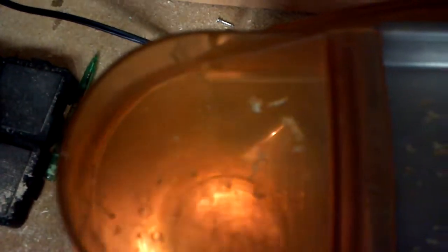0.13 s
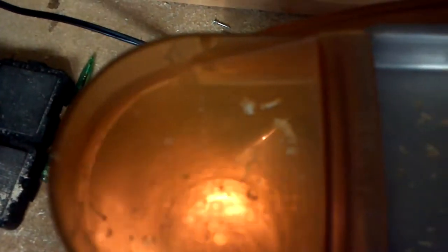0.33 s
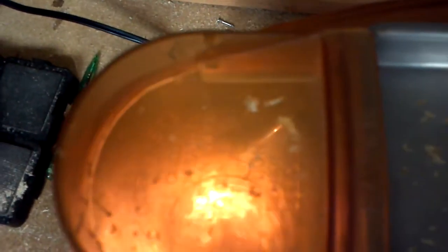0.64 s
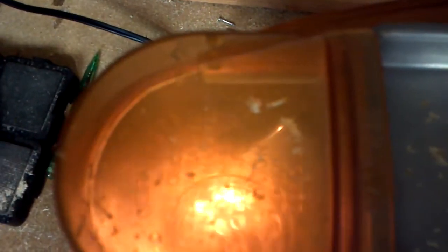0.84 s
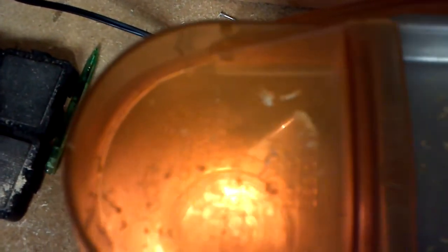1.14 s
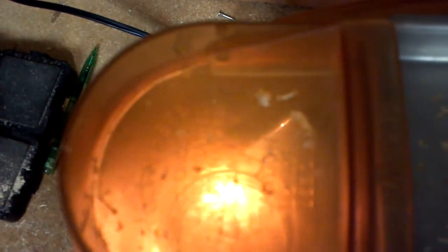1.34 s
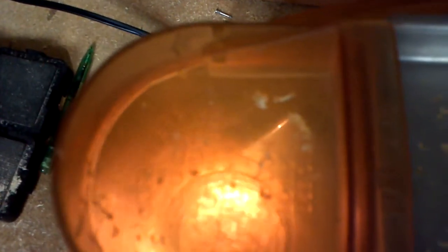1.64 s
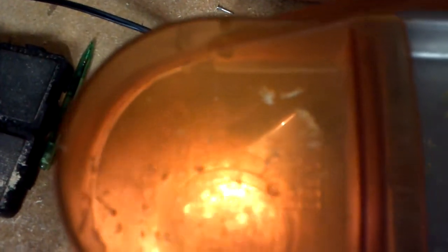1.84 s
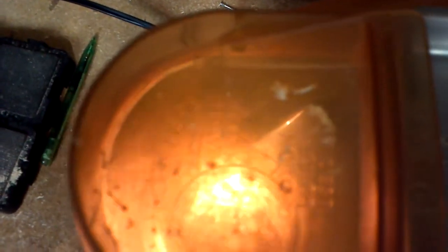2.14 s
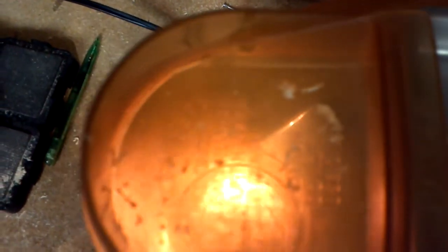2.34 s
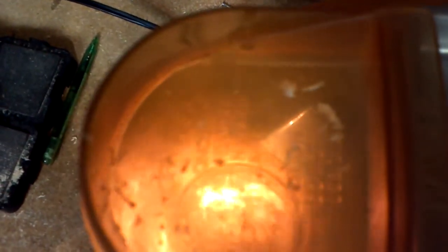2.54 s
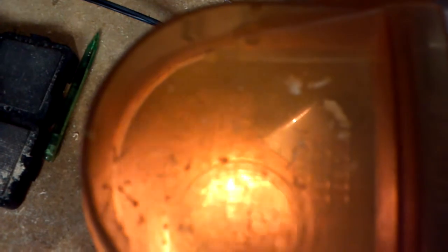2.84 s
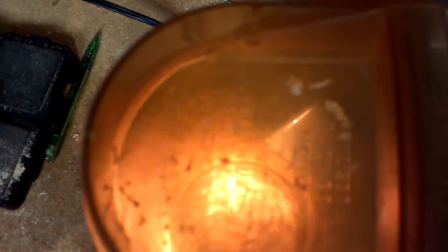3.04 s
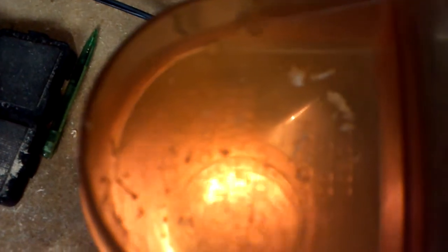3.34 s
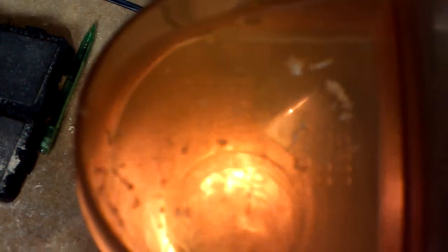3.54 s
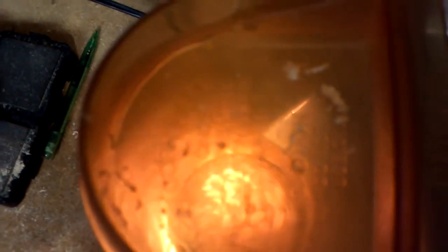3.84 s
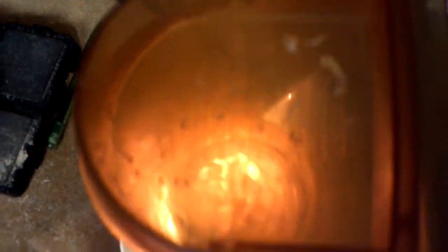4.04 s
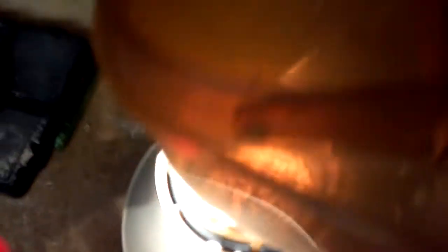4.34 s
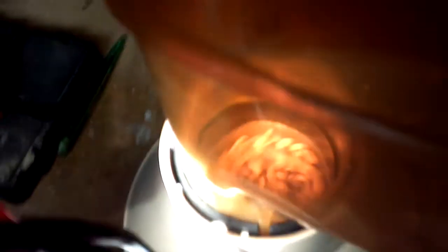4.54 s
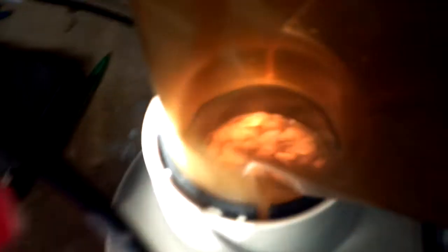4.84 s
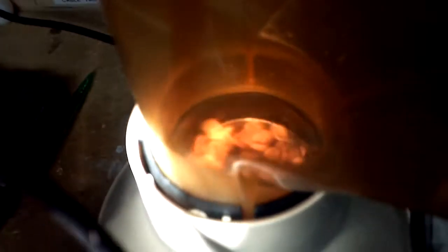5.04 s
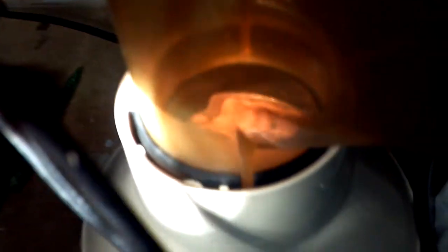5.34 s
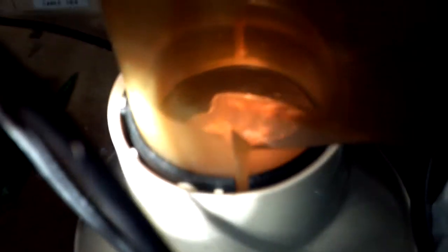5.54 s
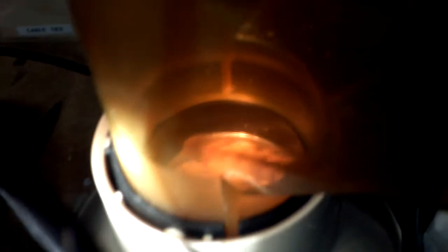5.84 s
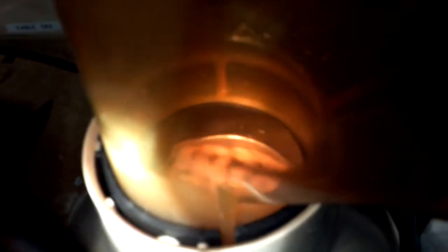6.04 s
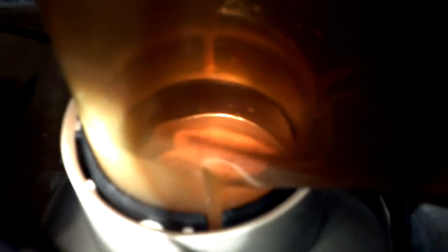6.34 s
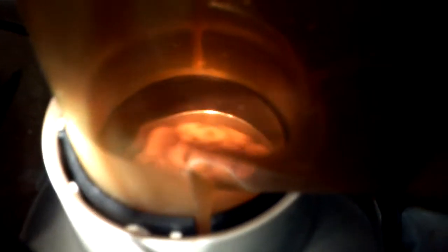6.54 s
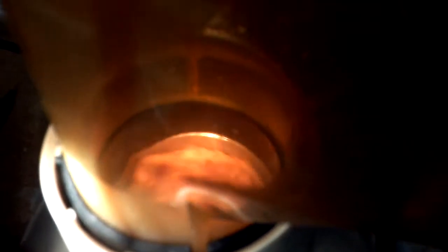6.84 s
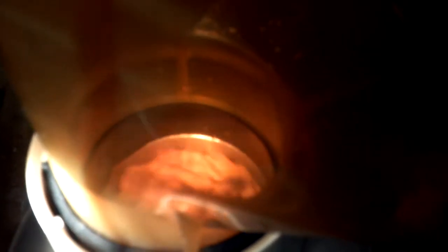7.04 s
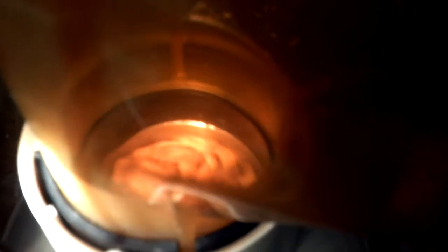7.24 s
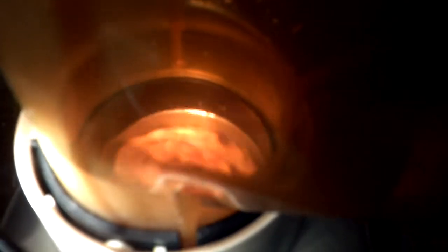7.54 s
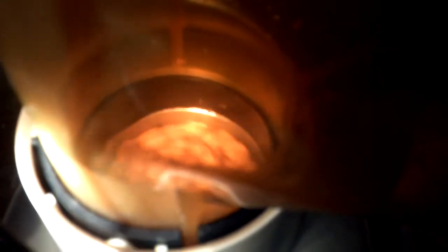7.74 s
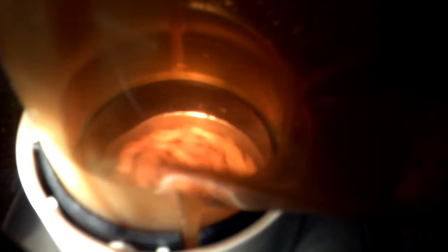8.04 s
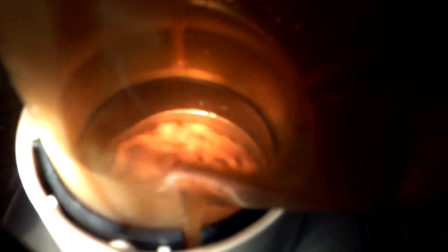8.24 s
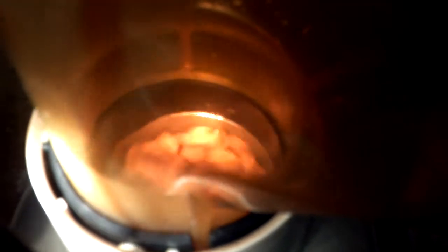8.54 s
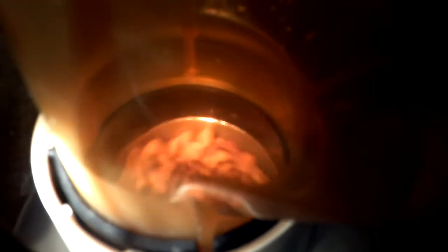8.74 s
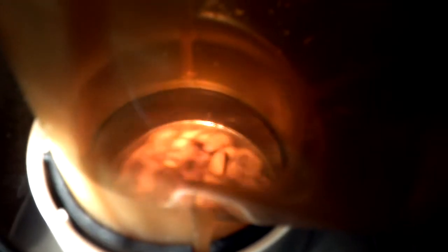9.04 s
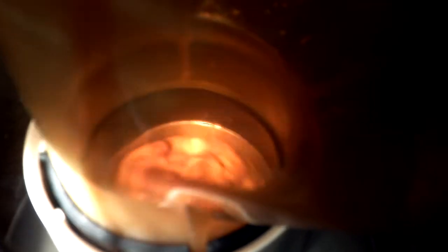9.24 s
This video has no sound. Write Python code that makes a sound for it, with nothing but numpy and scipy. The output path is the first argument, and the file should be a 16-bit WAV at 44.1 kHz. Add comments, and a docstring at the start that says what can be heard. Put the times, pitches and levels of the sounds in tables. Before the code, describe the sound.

From 0 seconds a hot-air popper is already running at full speed, very close, roasting coffee beans on a workbench. A broad, breathy fan rush dominates, with a hollow mid resonance that throbs unevenly. Through it run a steady motor hum, a higher blade tone around 1150 Hz, thin whining partials and a fine brush buzz. Dense, light bean ticks rattle and swirl over the top, a few harder. From 0 to 4 seconds the hiss slowly brightens and the pitch sags almost imperceptibly. Between about 4.1 and 4.9 seconds the microphone moves from above the hood to the open spout: the blade tone dips, then returns stronger, low hum near 230 Hz rises, the colour sweeps and the patter softens. By 6 seconds it settles, the blade tone peaking near 6.4, and the wide stereo roar continues unbroken to about 9.4 seconds, with no ending or shutdown.

```python
"""On a workbench, a hot-air popper roasts coffee beans, heard from close above its plastic hood.
Filtered noise makes the fan's rush through the chamber; sines locked to one shaft make the hum, blade tone
and motor whine; a repeating comb makes the brushes, and short noise bursts make the patter of the beans.
After four seconds the stereo camera moves down to the open spout, where hum and blade tone are stronger."""
import sys
import numpy as np
from scipy import signal
from scipy.fft import rfft, irfft
from scipy.io import wavfile
from scipy.ndimage import map_coordinates

SR = 44100
rng = np.random.default_rng(int(sys.argv[2]) if len(sys.argv) > 2 else 0)


def inscribe(sig):
    """Save sig as 16-bit PCM at rate SR to the path in sys.argv[1].

    A 1-D sig is mono; a 2-D sig holds one channel per row.
    Samples are clipped to [-1, 1] before scaling.
    """
    pcm = np.round(np.clip(np.atleast_2d(sig).T, -1, 1) * 32767)
    wavfile.write(sys.argv[1], SR, pcm.astype(np.int16))


N = 414981
TIME = np.arange(N) / SR  # s
FREQ = np.arange(N // 2 + 1) * SR / N  # Hz
SIDES = np.array([[1], [-1]])  # left, right

# where the camera is: time_s, place (0 above the hood, 1 at the spout)
PLACE = [(0, 0), (4.1, 0.012), (4.42, 0.51), (4.85, 0.84), (6.0, 1), (9.4, 1)]
# motor partials before the final filters:
# multiple of the shaft rate (used rounded), above_hood_db, at_spout_db
PARTIALS = [(2, -31, -34), (3, -32, -34.5), (6, -52, -38.5), (7, -31, -32), (8, -41, -43), (9, -45, -43.5),
            (11, -47, -63), (14, -49, -48.5), (16, -54, -54), (17, -53, -57), (18, -47, -50.5),
            (19, -47.5, -47), (28, -57, -58), (29, -53, -53.5), (30, -48, -62), (31, -60, -50),
            (32, -60, -45.5), (34, -46, -54), (35, -49, -48), (36, -51, -58), (37, -52, -50),
            (38, -46.5, -51.5), (39, -52, -52), (40, -58, -51), (41, -50, -43.5), (42, -59, -49),
            (44, -60, -49), (45, -56, -46), (46, -51, -50), (50, -50, -52), (51, -53, -56), (52, -53, -54),
            (61, -56, -63), (62, -59, -64), (62.74, -61, -57)]
# stereo spread of rush and whine before widening: pitch_hz, side_minus_mid_db
SPREAD = [(60, 10), (150, 0.5), (300, -7), (520, -17), (750, -16), (1100, -4), (1500, -2.5), (1900, 9),
          (2100, 9.5), (2320, 10), (2550, 49), (2800, 3.5), (3500, 0), (4600, -2.5), (5200, 20),
          (5500, 1.5), (6000, -0.5), (7400, -1), (7800, 20), (8200, -0.5), (12200, -1), (12950, 7),
          (13500, -1)]


def undb(db):
    """Decibels to gain."""
    return 10 ** (np.asarray(db) / 20)


def curve(rows, axis=1):
    """One column of a time table at every sample."""
    rows = np.array(rows)
    return np.interp(TIME, rows[:, 0], rows[:, axis])


def spectrum(rows, hz=FREQ, axis=1):
    """One column of a frequency table, joined on a log axis."""
    rows = np.array(rows)
    return np.interp(np.log(hz + 1), np.log(rows[:, 0]), rows[:, axis])


def colour(x, db):
    """Filter by a gain for every frequency."""
    return irfft(rfft(x) * undb(db), N)


def walk(rate_hz):
    """Smooth random wandering with a spread near 1, through rate_hz random points a second."""
    points = rng.standard_normal(2048)
    coarse = np.arange(0, N + 64, 64)
    smooth = map_coordinates(points, [coarse / SR * rate_hz], mode="wrap")
    return np.interp(np.arange(N), coarse, smooth)


def stereo(mid, side, side_db):
    """Left and right from a shared and an opposed part, at constant power."""
    share = undb(side_db)
    return (mid + SIDES * share * side) / np.sqrt(1 + share ** 2)


def airflow(place, trim_db=-0.5, flutter_db=0.79, flutter_hz=45):
    """Fan turbulence rushes through the chamber; its colour depends on where it is heard from."""
    # rush density before the trim and the peaks: pitch_hz, above_hood_db_per_hz, at_spout_db_per_hz
    rush_table = [(30, -95, -85), (75, -90, -88.5), (168.6, -73, -69.7), (381, -53, -53),
                  (628, -52.5, -55.5), (744, -60, -52.5), (1395, -63, -62.5), (1704, -51.6, -54),
                  (2247, -70.5, -68), (5510, -76, -76.5), (5770, -67.5, -64.5), (8100, -73.5, -75),
                  (11500, -74, -70.5), (13100, -83.5, -79)]
    # peaks and dips in the colour of the rush, above the hood and at the spout:
    # pitch_hz, width_hz, lift_above_db, lift_spout_db
    peak_table = [(370, 37, 2.5, 0.5), (485, 67, 3, 2.5), (539, 62.3, 11.5, 11.5), (682, 24, 7, 1),
                  (832, 74, -0.5, 2.5), (980, 43, -1, -4), (1226, 32, 3.5, -4.5), (1315, 40, 0, -3),
                  (1365, 55, -6.5, 5.5), (1460, 47, -2, 4), (1925, 250, 9.5, 1), (2460, 220, -4.5, -10),
                  (3030, 210, 4.5, -13.5), (3084, 780, 1, 10.5), (3800, 590, 4, -1), (4454, 330, 3.5, 7),
                  (5240, 400, 5.5, -0.5), (7030, 210, 0, 0.5), (9300, 300, -4.5, 0)]
    mid, side = rfft(rng.standard_normal((2, N)))
    noise = stereo(mid, side, spectrum(SPREAD)) * np.sqrt(SR / 2)  # unit power per Hz
    above_db = spectrum(rush_table, axis=1) + trim_db
    spout_db = spectrum(rush_table, axis=2) + trim_db
    for hz, width, lift_above, lift_spout in peak_table:
        bell = 1 / (1 + (2 * (FREQ - hz) / width) ** 2)
        above_db = above_db + lift_above * bell
        spout_db = spout_db + lift_spout * bell
    above = irfft(noise * undb(above_db), N)
    spout = irfft(noise * undb(spout_db), N)
    rush = (1 - place) * above + place * spout
    # the tumbling beans choke and free the stream
    return rush * undb(flutter_db * walk(flutter_hz))


def surge(rush, centre_hz=530, width_hz=90, depth_db=1.2, rate_hz=13):
    """The main air resonance throbs unevenly, as narrow noise does."""
    tone = irfft(rfft(rush) * np.exp(-((FREQ - centre_hz) / width_hz) ** 2), N)
    return rush + tone * (undb(depth_db * walk(rate_hz)) - 1)


def hood(rush, ring_hz=1880, width_hz=300):
    """The hood's upper ring, a band of the rush, swells and fades as the camera moves."""
    # the ring grows toward the rim, drops past it, swells again at the spout, then settles:
    # time_s, extra_level_db
    ring_table = [(0, -2.9), (3.8, 1.5), (4.45, 2.5), (4.8, -2.2), (5.5, 2.6), (7.3, 0), (9.4, -0.77)]
    ring = irfft(rfft(rush) * np.exp(-((FREQ - ring_hz) / width_hz) ** 2), N)
    return rush + ring * (undb(curve(ring_table)) - 1)


def brushes(shaft, place, shaft_hz, above_db=-58, spout_db=-57, scatter_db=3, size=2048):
    """The brushes scrape the same pattern every turn: a thin comb between the motor's partials."""
    # colour of the comb, relative: pitch_hz, level_db
    brush_table = [(3000, 0.5), (3900, -2.5), (4700, 6), (5100, -25), (5600, -11), (6400, -10), (7400, 5),
                   (9500, -1.5), (11800, -2), (13000, -5), (14200, 0), (15000, -3)]
    orders = np.setdiff1d(np.arange(13, 68), np.round(np.array(PARTIALS)[:, 0]))
    shape = (2, len(orders))  # left and right differ
    angle = shaft / (2 * np.pi) % 1 * size  # table position within the turn
    scrape = 0
    for weight in ((1 - place) * undb(above_db), place * undb(spout_db)):
        line_db = spectrum(brush_table, orders * shaft_hz) + scatter_db * rng.standard_normal(shape)
        lines = np.zeros((2, size // 2 + 1), complex)
        lines[:, orders] = undb(line_db) * np.exp(2j * np.pi * rng.random(shape))
        turns = irfft(lines) * size / np.sqrt(2)  # one turn of the shaft for each side
        comb = np.array([np.interp(angle, np.arange(size), turn) for turn in turns])
        scrape = scrape + weight * comb
    return scrape


def whine(shaft, place, shaft_hz, waver_db=1.5, waver_hz=2.987, low_blur=0.9, blur=0.12, blur_hz=22):
    """Partials of the motor; all waver slightly in phase (radians), the lowest ones most."""
    tones = 0
    for multiple, above_db, spout_db in PARTIALS:
        order = round(multiple)
        phase = order * shaft + (low_blur if multiple < 4 else blur) * walk(blur_hz)
        phase = phase + rng.uniform(0, 2 * np.pi)
        gain = undb(above_db * (1 - place) + spout_db * place + waver_db * walk(waver_hz))
        side_db = spectrum(SPREAD, order * shaft_hz)
        tones = tones + gain * stereo(np.cos(phase), np.sin(phase), side_db)
    return np.sqrt(2) * tones


def fan(shaft, place, blades=5, ripple_hz=120, ripple_db=-19):
    """Imbalance hums once a turn, louder at the spout; the blades sing, with a mains-ripple sideband."""
    # the blade tone fades as the hood shades the fan, and is strong at the open spout:
    # time_s, level_db before the trim
    blade_table = [(0.08, -31), (0.21, -29), (4.03, -32.5), (4.34, -35.5), (4.83, -27.5), (6.42, -24),
                   (6.78, -26), (9.3, -26)]
    hum_above_db, hum_spout_db = -48.5, -31
    side_above_db, side_spout_db = 6, 1  # opposed part of the hum against its shared part
    blade_trim_db, blade_waver_db, blade_waver_hz = -1, 0.5, 14
    blade_blur, blade_blur_hz = 0.08, 25  # radians, Hz

    side = undb(side_above_db * (1 - place) + side_spout_db * place)
    hum_gain = undb(hum_above_db * (1 - place) + hum_spout_db * place)
    hum = hum_gain * (np.cos(shaft) + SIDES * side * np.sin(shaft))

    passing = blades * shaft + blade_blur * walk(blade_blur_hz)
    sideband = undb(ripple_db) * np.cos(passing + 2 * np.pi * ripple_hz * TIME)
    blade_db = curve(blade_table) + blade_trim_db + blade_waver_db * walk(blade_waver_hz)
    blade = undb(blade_db) * (np.cos(passing) + sideband)
    return np.sqrt(2) * (hum + blade)


def beans(place, size_db=4, ring_s=0.00095, count=14000):
    """Beans tick on the wall and each other, bunched by the swirl: many light touches, a few hard ones."""
    # colour of a bean striking the wall, relative: pitch_hz, level_db
    bean_table = [(1200, -76), (3300, 11), (5000, -9), (6200, 14.5), (8500, -5), (11800, 9.5), (15000, -15)]
    above_db, spout_db = -41.5, -46.5
    bunch_db, bunch_hz = 1.5, 17
    swirl_db, swirl_hz = 1.6, 2.55
    at = rng.integers(0, N, count)
    force = undb(size_db * np.minimum(rng.exponential(size=count), 6))
    strikes = np.bincount(at, force ** 2, N) + 1e-18  # tiny floor keeps the root real
    energy = signal.lfilter([1], [1, -np.exp(-2 / (ring_s * SR))], strikes)
    patter = colour(np.sqrt(energy) * rng.standard_normal((2, N)), spectrum(bean_table))
    patter = patter * undb(bunch_db * walk(bunch_hz))
    level_db = above_db * (1 - place) + spout_db * place + swirl_db * walk(swirl_hz)
    return patter / np.std(patter) * undb(level_db)


def churn(sound, flicker_db=0.74, flicker_hz=11, count=9):
    """The shifting heap colours the hiss: neighbouring bands flicker on their own."""
    whole, out = rfft(sound), sound
    for hz in np.geomspace(3200, 12000, count):
        band = irfft(whole * np.exp(-(10 * (FREQ / hz - 1)) ** 2), N)
        out = out + band * (undb(flicker_db * walk(flicker_hz)) - 1)
    return out


def bench(sound, echo_db=-18, edge_hz=3000):
    """The bench mirrors the treble: fine ripples of colour that slide as the camera moves."""
    # extra path of the echo from the bench: time_s, detour_m
    detour_table = [(0, 1.0), (1.2, .97), (4.1, .9), (4.9, .72), (6.2, .66), (7.2, .7), (9.4, .69)]
    treble = irfft(rfft(sound) * (1 - 1 / (1 + (FREQ / edge_hz) ** 8)), N)
    late = TIME - curve(detour_table) / 343  # speed of sound in m/s
    echo = np.array([np.interp(late, TIME, side) for side in treble])
    return sound + undb(echo_db) * echo


def sweeps(sound, size=2048):
    """Some bands briefly dip or swell; a few near the rim and the spout glide upward."""
    # bands that dip or swell for a moment, early, at the rim and at the spout:
    # centre_time_s, length_s, centre_hz, glide_hz_per_s, width_hz, lift_db
    band_table = [(.45, 0.78, 9450, 0, 300, 4), (1.95, 0.89, 700, 0, 120, -5),
                  (4.195, 0.45, 1680, 0, 300, -3.5), (4.42, 0.63, 1550, 596.5, 280, -6),
                  (4.85, 1.1, 2840, -2, 600, -6.5), (5.95, .5, 1650, 2, 300, -1.5),
                  (5.5, 0.86, 4370, 2, 500, 1.5), (5.75, 2.6, 860, 6, 260, 3),
                  (6.102, .6, 3920, 500, 600, -4.5), (6.4, 0.55, 3300, 0, 600, 2),
                  (6.796, 0.3, 640, 0, 600, -1.3), (6.87, 0.26, 1380, 0, 300, -4),
                  (7.404, 0.9, 3630, 0, 500, 2.5)]
    overlap = size - size // 4
    hz, t, frames = signal.stft(sound, SR, nperseg=size, noverlap=overlap)
    db = 0
    for at, length, centre, glide, width, lift in band_table:
        away = (hz[:, None] - centre - glide * (t - at)) / width
        db = db + lift * np.exp(-(2 * (t - at) / length) ** 2 - (2 * away) ** 2)
    return signal.istft(frames * undb(db), SR, nperseg=size, noverlap=overlap)[1][:, :N]


def aim(sound, edge_hz=2600, sway_db=0.22, sway_hz=7.7):
    """The treble beams, so its level follows the camera's aim and sways with the hand."""
    # the hiss comes up slowly at first, then dips and recovers: time_s, treble_level_db before the sway
    treble_table = [(0, -1.4), (1.9, -0.36), (3.7, 0.23), (4.9, -0.62), (6.3, -0.18), (9.4, 0.22)]
    treble = irfft(rfft(sound) * (1 - 1 / (1 + (FREQ / edge_hz) ** 10)), N)
    return sound + treble * (undb(curve(treble_table) + sway_db * walk(sway_hz)) - 1)


def scene():
    """One shaft drives the tones and the brushes; its speed trembles slightly with the load."""
    # the motor sags a little under its load and recovers: time_s, shaft_rate_hz before the tremble
    speed_table = [(0, 230.8), (1.2, 230.8), (3.2, 230.3), (4.5, 230.1), (5.3, 230.4), (6.6, 230.6),
                   (7.3, 230.45), (9.4, 230.5)]
    place = np.clip(curve(PLACE), 0, 1)
    hz = curve(speed_table) + 0.09 * walk(12)
    shaft = 2 * np.pi * np.cumsum(hz) / SR
    popper = hood(surge(airflow(place)))
    popper = popper + brushes(shaft, place, hz.mean()) + whine(shaft, place, hz.mean())
    popper = popper + fan(shaft, place) + beans(place)
    return aim(sweeps(bench(churn(popper))))


def record(dry, full_hz=1250, lag_s=17 / 44100, top_hz=15150):
    """The camera widens its stereo: above the bass, each side subtracts the delayed other microphone."""
    # balance at the microphones, before the widening: pitch_hz, left_minus_right_db
    balance_table = [(1100, 0), (1500, -7), (1850, -10), (2300, -2), (2600, 0), (3100, 5), (4500, 3),
                     (6000, 5), (15000, 4.5)]
    # balance applied after the widening: pitch_hz, left_minus_right_above_db, left_minus_right_spout_db
    lean_table = [(150, 2.5, 1), (227, -2, -.5), (280, 0.5, 0.5), (486, 4.5, 8.5), (700, 1, -1.5),
                  (890, 2, -1), (1300, 0.5, 0), (1820, -6, -6), (2200, 0, 0), (2900, 0, 0), (3150, 0, 1.5),
                  (4600, 0, 0)]
    place = np.clip(curve(PLACE), 0, 1)
    balance = undb(SIDES * spectrum(balance_table) / 2)
    ports = rfft(dry) * balance / np.sqrt(np.mean(balance ** 2, axis=0))
    share = np.minimum(FREQ / full_hz, 1) ** 3  # full subtraction from full_hz upward
    delayed_other = np.exp(-2j * np.pi * FREQ * lag_s) * ports[::-1]
    wide = (ports - share * delayed_other) / np.sqrt(1 + share ** 2)
    above = irfft(wide * undb(SIDES * spectrum(lean_table, axis=1) / 2), N)
    spout = irfft(wide * undb(SIDES * spectrum(lean_table, axis=2) / 2), N)
    low_pass = signal.ellip(10, 0.2, 80, top_hz, fs=SR, output="sos")
    return signal.sosfilt(low_pass, (1 - place) * above + place * spout)


dry = scene()
out = record(dry)
inscribe(out)
```